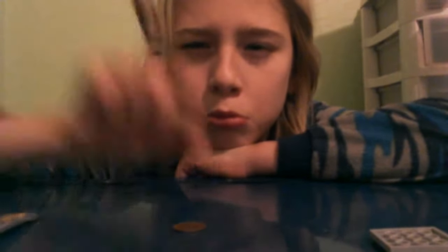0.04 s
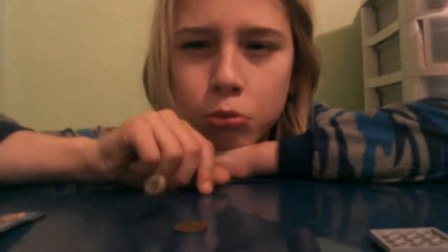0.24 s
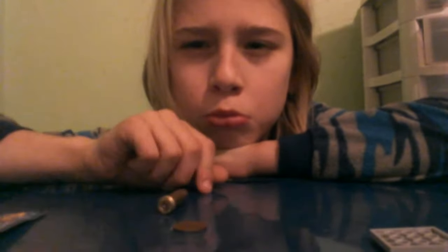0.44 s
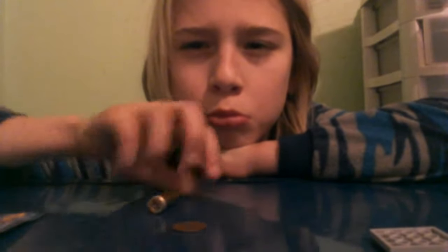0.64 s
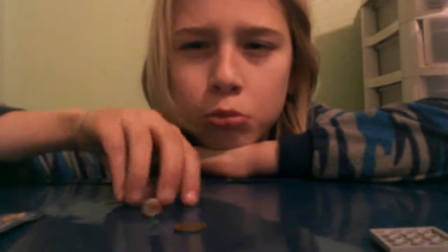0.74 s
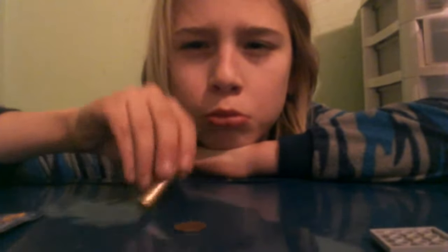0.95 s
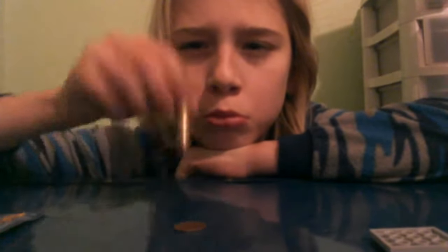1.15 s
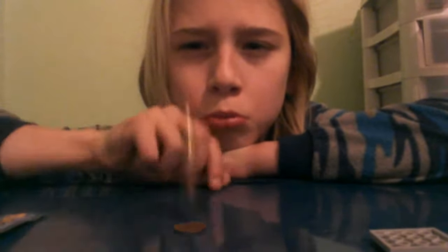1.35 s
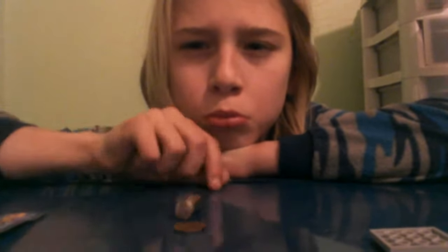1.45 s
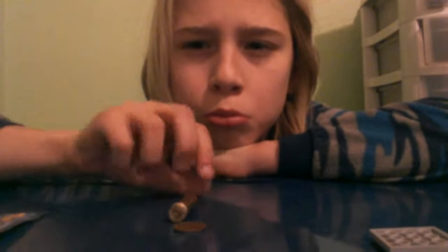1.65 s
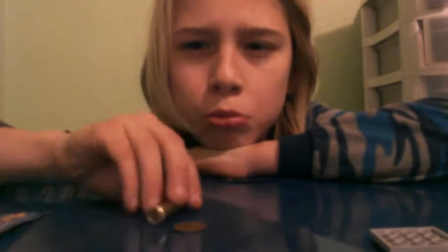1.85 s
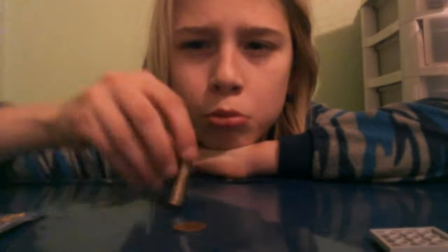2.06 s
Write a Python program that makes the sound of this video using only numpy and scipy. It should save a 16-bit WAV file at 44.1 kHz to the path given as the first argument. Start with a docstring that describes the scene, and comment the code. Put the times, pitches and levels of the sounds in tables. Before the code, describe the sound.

A small metal casing clatters on a hard tabletop, close and distorted. Finger clicks and a dull knock at 0.12-0.21 s lead to loud cracks at 0.27 and 0.39 s, with tiny fading bounces. Soft thumps and scrapes follow from 0.7 to 1.1 s. Another flick at 1.33 s brings cracks at 1.47 and 1.56 s, then faint handling. Short room tail, faint hum and hiss.

```python
"""A small metal casing is flipped twice and clatters onto a hard tabletop, overloading the close microphone.
Each hit or strong early echo is a noise crack plus damped modes of contact and tabletop; tumbling adds knocks.
Fingers flick and click in short rings and noise bursts; the hand thumps and slides in shaped noise.
A small room answers with a diffuse tail, over a faint hum and hiss of steady coloured noise."""
import sys
import numpy as np
from scipy import signal
from scipy.fft import rfft, irfft, next_fast_len
from scipy.io import wavfile
from scipy.ndimage import map_coordinates

SR = 44100
rng = np.random.default_rng(int(sys.argv[2]) if len(sys.argv) > 2 else 0)


def put_to_file(sound):
    """Save the sound as 16-bit audio at rate SR, in the file named by the first command-line argument."""
    columns = np.atleast_2d(sound).T  # one column per channel
    safe = np.clip(columns, -1, 1)
    whole_steps = np.round(safe * 32767)
    wavfile.write(sys.argv[1], SR, whole_steps.astype(np.int16))


N = 92610
LENGTH = SR // 2  # samples of one event
T = np.arange(LENGTH) / SR


def amp(db):
    """Decibels to gain."""
    return 10 ** (np.asarray(db) / 20)


def unit(x):
    """Scale to rms 1."""
    return x / np.sqrt(np.mean(x ** 2) + 1e-20)


def along(points, hz):
    """Interpolate (Hz, value) points on a log-frequency axis."""
    point_hz, value = np.transpose(points)
    return np.interp(np.log(hz + 1), np.log(point_hz + 1), value)


def filtered(x, response):
    """Multiply the spectrum of x by a response of frequency."""
    n = x.shape[-1]
    padded = next_fast_len(n + SR // 8)
    hz = np.fft.rfftfreq(padded, 1 / SR)
    return irfft(rfft(x, padded) * response(hz), padded)[..., :n]


def noise(colour, alike, size):
    """Coloured stereo noise of rms 1; the mid-side balance sets the left-right likeness."""
    def mid_side_gains(hz):
        angle = np.arccos(np.clip(along(alike, hz), -1, 1)) / 2
        return amp(along(colour, hz)) * [np.cos(angle), np.sin(angle)]

    mid, side = filtered(rng.standard_normal((2, size)), mid_side_gains)
    return unit(np.array([mid + side, mid - side]))


def fade(t60_s, t=T):
    """Exponential decay, 60 dB down after t60_s."""
    return np.exp(-np.log(1000) * t / t60_s)


def dull(x, hz, order=1):
    """A softer contact loses its treble: low-pass."""
    return signal.lfilter(*signal.butter(order, min(hz, SR / 2 - 100), fs=SR), x)


def pan(db):
    """Gains of left and right, db apart."""
    return amp(np.array([[db], [-db]]) / 2)


def add(out, start_s, x):
    """Mix one event into out at start_s."""
    i = round(start_s * SR)
    out[:, i:i + LENGTH] += x[:, :N - i]


def wobble(points_per_s):
    """A smooth random curve through normally distributed points."""
    return map_coordinates(rng.standard_normal(N // 10), [np.arange(N) * points_per_s / SR])


LAG_S, LAG_SPREAD_S = 0.00011, 0.00007


def ring(modes, scatter_db, detune):
    """Damped modes, struck a little differently each time; each reaches the right side late by its own path."""
    out = np.zeros((2, LENGTH))
    for k, (hz, db, t60_s) in enumerate(modes):
        level_draw, pitch_draw, lag_draw = rng.standard_normal(3)
        lag_s = np.array([[0], [LAG_S + LAG_SPREAD_S * abs(lag_draw)]])
        t = np.maximum(T - lag_s, 0)
        tone = np.sin(2 * np.pi * hz * (1 + detune * pitch_draw) * t)
        out += (-1) ** k * amp(db + scatter_db * level_draw) * fade(t60_s, t) * tone
    return out


# Casing hits the table, and strong early echoes of its hits off wall or ceiling. Each row: start in seconds,
# level in dB, dull above in Hz, left-right in dB, tabletop ring in dB, room in dB.
HITS_AND_ECHOES = [(0.2693, 11, 5560, -0.5, -4.5, -2), (0.2778, -13.5, 1510, -1, -8.5, -12),
                   (.290, -6, 12160, 11.5, -10, 5), (0.3869, 2.5, 4890, 0, -7, -0.5),
                   (0.4012, -12.5, 9000, 5, -9.5, 5.5), (0.4212, -26, 3100, -1, 10.5, -5.5),
                   (.438, -31, 5940, 2, 9, -5), (0.454, -34, 1970, -16.5, 14, -16),
                   (1.4679, -15, 5000, 6.5, 2, -4), (1.469, 7, 6900, 8, -5, -1),
                   (1.479, -11, 2804, 7, -2.5, 4.5), (1.5559, -0.5, 4090, 0, -4, 0.5),
                   (1.5958, -27, 5040, -3, 6.5, 6.5), (1.612, -28, 1203, -11.5, 7.5, 12.5),
                   (1.6209, -35, 1500, -3.5, 15, -14.5)]
# Short clack of the contact. Each row: mode in Hz, level in dB, t60 in seconds.
CLACK_MODES = [(1036, -4, 0.0075), (1380, -7, 0.016), (1750, -9, .012), (2119, -3, 0.021),
               (2930, -5, 0.015), (4180, -7, 0.011)]
# Modes of the tabletop. Each row: mode in Hz, level in dB, t60 in seconds.
TABLETOP_MODES = [(88, -23.5, .1), (135, -25, 0.1), (233.8, -21, 0.18), (390.8, -7.5, 0.082),
                  (538.5, -24.5, 0.12), (592.5, -20.5, .1), (774.6, -28, .1), (924, -12.5, 0.069),
                  (1121, -24.5, 0.13), (1340, -19.5, 0.08), (1816, -21, 0.06)]
# Colour of the contact noise. Each row: frequency in Hz, level in dB.
CRACK_COLOUR = [(40, -9), (200, -24), (700, 5), (2000, 13), (4000, 2.5), (5800, -12), (9000, -12.5),
                (15000, -17)]
# Left-right likeness of noise on the table and of the room. Each row: frequency in Hz, likeness (1 = same).
TABLE_ALIKE = [(100, 0.58), (400, 0.26), (1000, 0.9), (3000, 0.13)]
CRACK_DB, CRACK_T60_S = 3.5, 0.013
ECHO_S, ECHO_DB = 0.0091, -19
ROOM_DB = -16


def casing_hits_and_echoes():
    """Each row cracks, clacks, rings the tabletop, excites the room and adds one fainter echo off a wall."""
    out = np.zeros((2, N))
    for start_s, db, dull_hz, pan_db, ring_db, room_db in HITS_AND_ECHOES:
        crack = noise(CRACK_COLOUR, TABLE_ALIKE, LENGTH) * fade(CRACK_T60_S)
        click = ring(CLACK_MODES, scatter_db=2, detune=0.023) + amp(CRACK_DB) * crack
        body = amp(ring_db) * ring(TABLETOP_MODES, scatter_db=2, detune=0.0043)
        tail = amp(ROOM_DB + room_db) * room_answer()
        add(out, start_s, amp(db) * dull(pan(pan_db) * click + body + tail, dull_hz))
        add(out, start_s + ECHO_S, amp(db + ECHO_DB) * dull(click, dull_hz))
    return out


# Casing's longest flight: take-off in seconds, landing in seconds.
FLIGHT_S = (0.29, .387)
# Modes of the casing's wall, two of them beating. Each row: mode in Hz, level in dB, t60 in seconds.
WALL_MODES = [(12300, -44.5, .33), (12390, -54, .25), (14200, -41, .1)]


def casing_singing():
    """The thin metal wall rings very high and faintly until the next contact stops it."""
    out = np.zeros((2, N))
    takeoff_s, landing_s = FLIGHT_S
    in_flight = T < landing_s - takeoff_s
    add(out, takeoff_s, ring(WALL_MODES, scatter_db=0.5, detune=0) * in_flight)
    return out


# Dull knocks as the casing tumbles. Each row: start in seconds, level in dB, left-right in dB,
# ring length factor, pitch factor, dull above in Hz.
KNOCKS = [(.2074, -9.5, -15, 1, 1, 9000), (.2117, -14, -12, .6, .58, 900),
          (1.4252, -19.5, -6, .6, .72, 750), (1.5947, -14.5, -2, .45, .85, 1800)]
# Ring of a knock before both factors. Each row: mode in Hz, level in dB, t60 in seconds.
KNOCK_MODES = [(330, -13, .04), (440, -9, .04), (727, -4, .07), (980, 0, .013), (1720, -1.5, .022),
               (3100, -9, .015)]
KNOCK_CRACK_DB, KNOCK_ROOM_DB = -7, -37.5


def casing_knocks():
    """Short hollow knocks, off to the right: scaled modes under a noise crack."""
    out = np.zeros((2, N))
    for start_s, db, pan_db, stretch, pitch, dull_hz in KNOCKS:
        crack = amp(KNOCK_CRACK_DB) * noise(CRACK_COLOUR, TABLE_ALIKE, LENGTH) * fade(CRACK_T60_S)
        modes = np.array(KNOCK_MODES) * [pitch, 1, stretch]
        hollow = ring(modes, scatter_db=0.8, detune=0.01)
        sides = pan(pan_db) / pan(pan_db).max()  # louder side at 0 dB
        tail = amp(KNOCK_ROOM_DB) * room_answer()
        add(out, start_s, amp(db) * dull(sides * (hollow + crack) + tail, dull_hz))
    return out


# Fingernail flicks the casing. Each row: start in seconds, level in dB.
FLICKS = [(0.1248, -30), (1.3267, -33.5)]
# Ring of a flick. Each row: mode in Hz, level in dB, t60 in seconds.
FLICK_MODES = [(1450, -1, .04), (1760, 0, .03)]
# Colour of finger clicks. Each row: frequency in Hz, level in dB.
TICK_COLOUR = [(40, -58), (230, 3), (500, 8), (1000, -11), (1600, 1.5), (2600, -5), (4000, -9.5),
               (5800, -19.5), (9000, -24.5), (15000, -23.5)]
TICK_T60_S = 0.062
FLICK_CLICK_DB, FLICK_DULL_HZ, FLICK_ROOM_DB = 0.5, 3000, -5.5


def nail_flicks():
    """A nail sends the casing spinning with a small pitched click: two modes and a noise burst."""
    out = np.zeros((2, N))
    for start_s, db in FLICKS:
        burst = noise(TICK_COLOUR, TABLE_ALIKE, LENGTH) * fade(TICK_T60_S)
        click = amp(FLICK_CLICK_DB) * burst + amp(FLICK_ROOM_DB) * room_answer()
        pitched = ring(FLICK_MODES, scatter_db=1, detune=0.01)
        add(out, start_s, amp(db) * (pitched + dull(click, FLICK_DULL_HZ)))
    return out


# Fingers click on casing and table. Each row: start in seconds, level in dB, dull above in Hz,
# room in dB, snap in dB.
TICKS = [(.154, -20.5, 4938, 1.5, -0.5), (1.3575, -20.5, 6000, -2.5, -2), (1.8053, -43.5, 3470, -0.5, -8),
         (2.0601, -39, 6050, 7, 1)]
TICK_SNAP_T60_S, TICK_RING_DB, TICK_ROOM_DB = 0.0081, -4.5, -13


def finger_ticks():
    """Light fingertip clicks: a brief bright snap over a duller burst, tabletop ring and room."""
    out = np.zeros((2, N))
    for start_s, db, dull_hz, room_db, snap_db in TICKS:
        burst = noise(TICK_COLOUR, TABLE_ALIKE, LENGTH) * fade(TICK_T60_S)
        body = amp(TICK_RING_DB) * ring(TABLETOP_MODES, scatter_db=0.5, detune=0.01)
        tail = amp(TICK_ROOM_DB + room_db) * room_answer()
        snap = amp(snap_db) * noise(CRACK_COLOUR, TABLE_ALIKE, LENGTH) * fade(TICK_SNAP_T60_S)
        add(out, start_s, amp(db) * (snap + dull(burst + body + tail, dull_hz)))
    return out


# Hand lands softly on the table. Each row: start in seconds, level in dB, thud dull above in Hz, boom in dB.
THUMPS = [(0.157, -22, 296, 4.5), (0.171, -19, 109.7, -7), (0.6812, -33, 215, 0.5), (0.713, -37, 221, -4),
          (0.845, -36.5, 129, -1), (1.3556, -29, 604, 0.5), (1.36, -28, 400, 1), (1.382, -31.5, 290, 3),
          (1.853, -32, 453, -5), (2.068, -36, 303, -2)]
# Tabletop's boom under a soft hand. Each row: mode in Hz, level in dB, t60 in seconds.
BOOM_MODES = [(95, -7, .08), (205, -5, .075), (265, -9, .055)]
# Colour of the thud. Each row: frequency in Hz, level in dB.
THUD_COLOUR = [(30, -22), (80, -7.5), (210, 6), (450, -10.5), (1000, -9.5), (4000, -20)]
THUMP_T60_S = 0.078


def hand_thumps():
    """A soft hand gives a low noise thud and sets the tabletop booming."""
    out = np.zeros((2, N))
    for start_s, db, dull_hz, boom_db in THUMPS:
        thud = unit(dull(noise(THUD_COLOUR, TABLE_ALIKE, LENGTH), dull_hz)) * fade(THUMP_T60_S)
        boom = amp(boom_db) * ring(BOOM_MODES, scatter_db=3.5, detune=0.009)
        add(out, start_s, amp(db) * dull(thud + boom, 2 * dull_hz))
    return out


# Hand and casing slide over the table. Each row: peak in seconds, rise in seconds, fall in seconds,
# hiss in dB, low rubbing in dB.
SLIDES = [(0.223, 0.11, 0.042, -60.5, -39), (.69, 0.038, 0.144, -66, -50),
          (0.808, 0.043, 0.042, -52.5, -52), (0.978, .003, .008, -67, -68), (1.009, .003, 0.0043, -46, -49),
          (1.035, 0.0023, 0.0057, -47.5, -69), (1.082, 0.075, 0.043, -45, -58),
          (1.432, 0.033, 0.0637, -64, -46.5), (1.875, 0.034, 0.063, -54.5, -48),
          (1.969, 0.0138, 0.019, -60.5, -56.5)]
# Colours of hiss and rubbing. Each row: frequency in Hz, level in dB.
HISS_COLOUR = [(100, -25), (700, -9.5), (1500, 4), (3200, 4.5), (4500, -1.5), (6000, -8), (10000, -13),
               (15000, -17)]
RUB_COLOUR = [(30, -28), (120, 1.5), (260, -4), (450, -3.5), (800, -12.5), (1500, -23.5), (4000, -41.5)]


def slides(rough_db=0.5, catches_per_s=110, scratch_db=1.0, scratches_per_s=800):
    """Friction swells and fades, catching unevenly: a scratchy hiss over a low rubbing."""
    t = np.arange(N) / SR
    hiss_gain, rub_gain = np.zeros(N), np.zeros(N)
    for peak_s, rise_s, fall_s, hiss_db, rub_db in SLIDES:
        swell = np.exp(-((t - peak_s) / np.where(t < peak_s, rise_s, fall_s)) ** 2)
        hiss_gain += amp(hiss_db) * swell
        rub_gain += amp(rub_db) * swell
    scratch = unit(amp(scratch_db * wobble(scratches_per_s)) * noise(HISS_COLOUR, TABLE_ALIKE, N))
    rubbing = noise(RUB_COLOUR, TABLE_ALIKE, N)
    catching = amp(rough_db * wobble(catches_per_s))
    return catching * (hiss_gain * scratch + rub_gain * rubbing)


# Colour of the room. Each row: frequency in Hz, level in dB.
ROOM_COLOUR = [(50, -11.5), (200, 1), (500, 2.5), (1000, -3.5), (2000, -0.5), (3300, -1), (4400, -9),
               (5800, -17.5), (9000, -19), (14500, -24.5)]
# Decay of the room. Each row: frequency in Hz, t60 in seconds.
ROOM_T60 = [(100, 0.19), (400, 0.23), (2000, 0.19), (5000, 0.205), (12000, 0.17)]
ROOM_RISE_S = 0.0033


def room_answer():
    """The room's diffuse answer to one blow: noise in which each frequency dies at its own speed."""
    hz, t, spectrum = signal.stft(noise(ROOM_COLOUR, TABLE_ALIKE, LENGTH), SR, nperseg=256)
    decay = fade(along(ROOM_T60, hz)[:, None], t)
    tail = signal.istft(spectrum * decay, SR, nperseg=256)[1][:, :LENGTH]
    return tail * (1 - np.exp(-(T / ROOM_RISE_S) ** 2))


# Colour of the room's hum and hiss. Each row: frequency in Hz, level in dB.
AIR_COLOUR = [(15, -25), (25, -13.5), (142, -3.5), (250, -5), (450, -13), (1000, -20), (1500, -22),
              (3000, -23), (5010, -29), (15000, -27.5)]
# Left-right likeness of the hum and hiss. Each row: frequency in Hz, likeness (1 = same).
AIR_ALIKE = [(100, 0.67), (400, 0.23), (1500, 0.095), (8000, 0.033)]
AIR_DB = -54


def room_air():
    """Steady coloured noise: the room's faint hum and hiss."""
    return amp(AIR_DB) * noise(AIR_COLOUR, AIR_ALIKE, N)


# Stereo lean of the microphones. Each row: frequency in Hz, left-right in dB.
MIC_LEAN = [(100, -1.5), (380, -1.5), (1200, -2.5), (2400, 0.5), (4300, 12), (8000, -8.5), (14000, -11.5)]


def scene():
    """Everything on the table, leaned by the microphones, over the room's hum and hiss."""
    casing = casing_hits_and_echoes() + casing_singing() + casing_knocks()
    hand = nail_flicks() + finger_ticks() + hand_thumps() + slides()
    leaned = filtered(casing + hand, lambda hz: amp(np.outer([1, -1], along(MIC_LEAN, hz)) / 2))
    return leaned + room_air()


LOW_CUT_HZ, TOP_HZ = 47, 14900
CLIP_TOP, CLIP_HARD = 1.0, 4  # full scale, knee exponent


def record(dry):
    """The microphone drops the deepest bass and clips on loud hits; a steep low-pass sets the band limit."""
    bass_cut = signal.sosfilt(signal.butter(2, LOW_CUT_HZ, "high", fs=SR, output="sos"), dry)
    clipped = bass_cut / (1 + np.abs(bass_cut / CLIP_TOP) ** CLIP_HARD) ** (1 / CLIP_HARD)
    return filtered(clipped, lambda hz: 1 / np.sqrt(1 + (hz / TOP_HZ) ** 70))


dry = scene()
out = record(dry)
put_to_file(out)
```